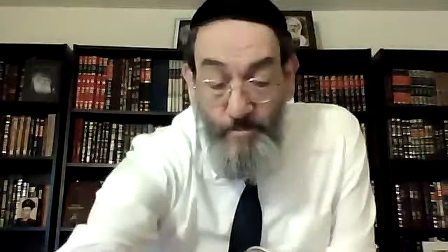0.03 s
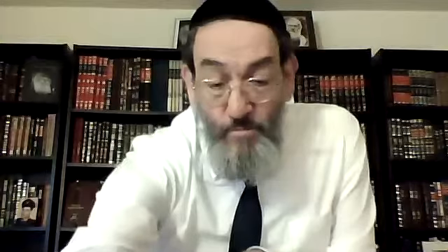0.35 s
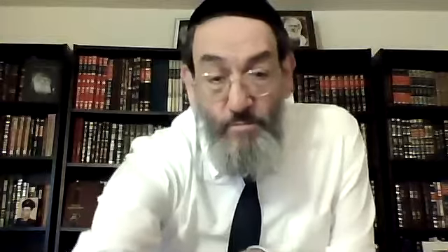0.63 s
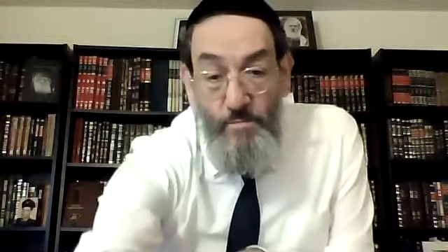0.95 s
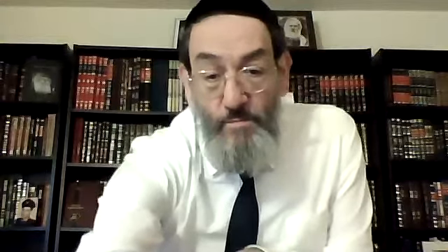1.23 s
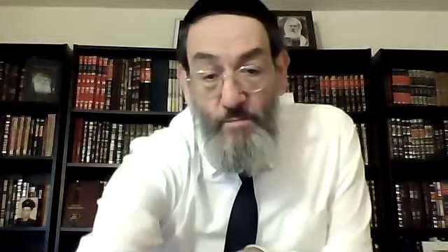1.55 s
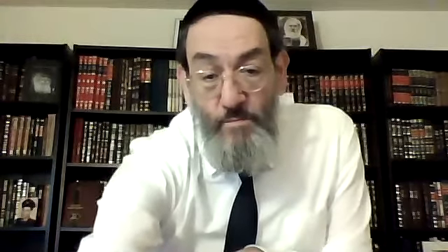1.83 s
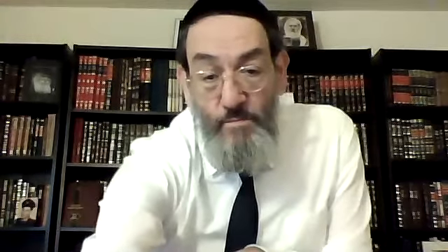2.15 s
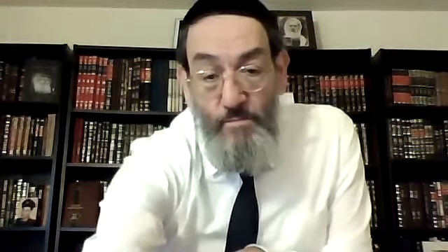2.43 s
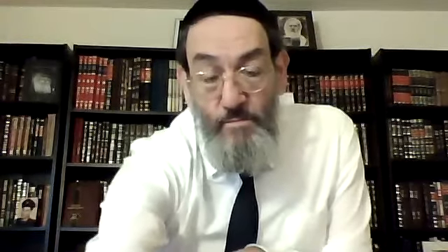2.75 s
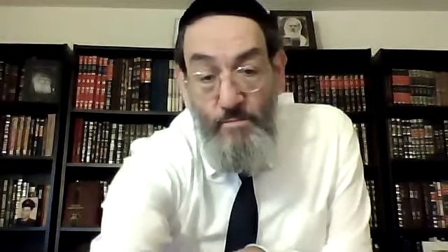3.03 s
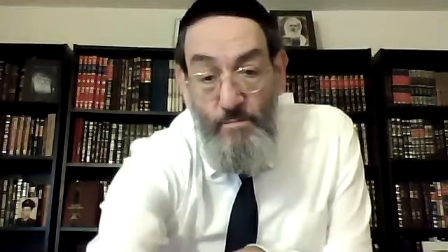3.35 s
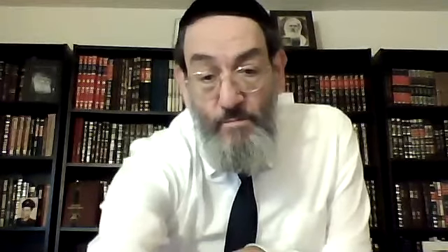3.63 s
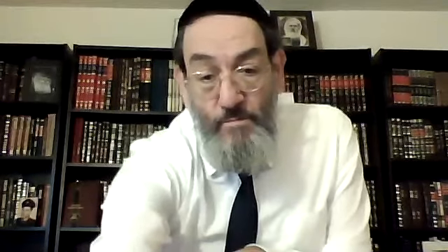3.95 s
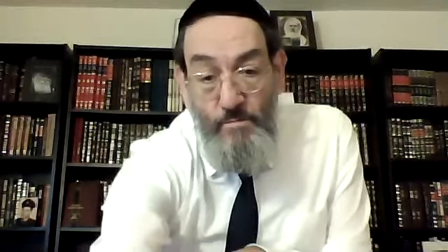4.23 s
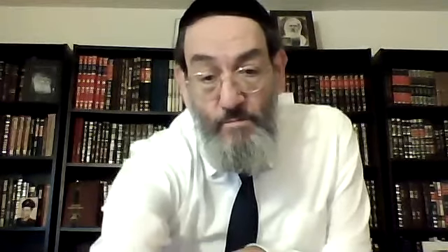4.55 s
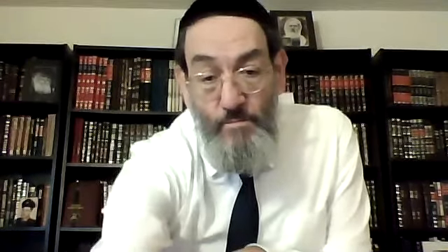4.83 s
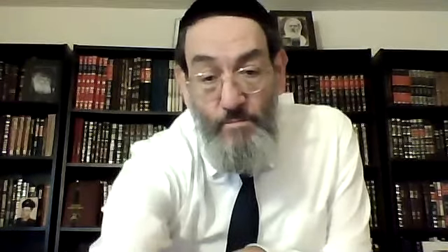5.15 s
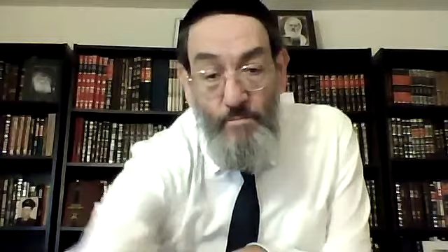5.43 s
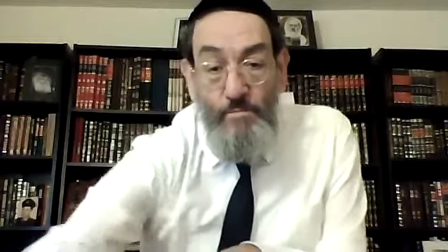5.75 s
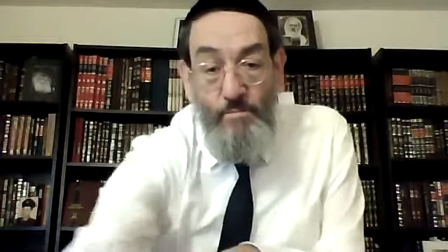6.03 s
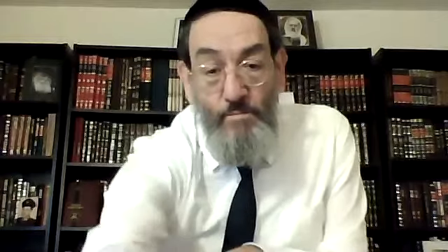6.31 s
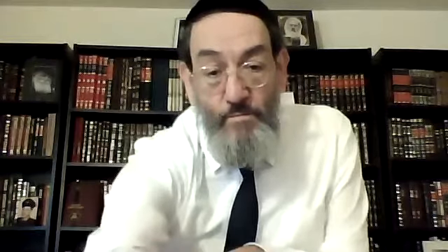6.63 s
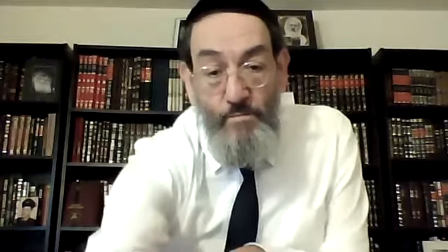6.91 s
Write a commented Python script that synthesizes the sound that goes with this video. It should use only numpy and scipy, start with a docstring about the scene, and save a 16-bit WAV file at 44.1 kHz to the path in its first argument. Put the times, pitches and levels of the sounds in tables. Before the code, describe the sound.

Two soft, dull bumps of a hand come through a wooden desk into the microphone standing on it, with faint ticks scattered between. Later a single much louder knock rings the wood briefly and rattles a loose plastic object, with a quick scrape. Under it all, a faint computer fan and a low hum run steadily in a small, furnished room with little echo.

```python
"""Bumps and a knock on a wooden desk

In a small, quiet room a computer fan whirs over a low, steady hum. A hand bumps the desk that
carries the microphone softly twice, making the wood ring, then knocks once so that a loose plastic
thing rattles. Small handling ticks come in between, and things hiss briefly as they slide."""
import sys
import numpy as np
from scipy import signal
from scipy.fft import rfft, irfft
from scipy.io import wavfile
from scipy.ndimage import uniform_filter1d

SR = 44100
rng = np.random.default_rng(int(sys.argv[2]) if len(sys.argv) > 2 else 0)


def inscribe(sig):
    """Save sig as 16-bit PCM at rate SR to the path in sys.argv[1].

    A 1-D sig is mono; a 2-D sig holds one channel per row.
    Samples are clipped to [-1, 1] before scaling.
    """
    pcm = np.round(np.clip(np.atleast_2d(sig).T, -1, 1) * 32767)
    wavfile.write(sys.argv[1], SR, pcm.astype(np.int16))


N = 307773
T = np.arange(N) / SR


def gain(db):
    """Turn decibels (dB) into a number to multiply a sound by."""
    return 10 ** (np.asarray(db) / 20)


def normalize(x):
    """Scale a signal so that its average size (rms) is 1."""
    return x / np.sqrt(np.mean(x ** 2))


def fade(t, fade_s):
    """Die away smoothly. A fade time is how long a sound takes to drop by 60 dB."""
    return np.exp(-np.log(1000) * t / fade_s)


def shape_tone(x, curve):
    """Make some frequencies louder and others softer, along a curve of (Hz, dB) points."""
    hz, db = np.transpose(curve)
    frequencies = np.maximum(np.arange(len(x) // 2 + 1) * SR / len(x), 1)
    change_db = np.interp(np.log(frequencies), np.log(hz), db)
    return irfft(rfft(x) * gain(change_db), len(x))


def drift(turns_per_s):
    """A smooth random wander around zero, about 1 in size."""
    step = int(SR / turns_per_s)
    stairs = np.repeat(rng.standard_normal(N // step + 1), step)
    smooth = uniform_filter1d(uniform_filter1d(stairs, step), step)
    return normalize(smooth[:N])


def add(out, start_s, x):
    """Mix the sound x into out, beginning at start_s."""
    i = int(start_s * SR)
    out[i:i + len(x)] += x[:N - i]


def strike(contacts, tones, damping_s=np.inf):
    """Pushes make an object ring: the longer the contact, the duller the sound."""
    t = T[:SR // 2]
    ring = sum(gain(db) * np.cos(2 * np.pi * hz * t) * fade(t, fade_s) for hz, db, fade_s in tones)
    out, push_t = np.zeros(N), T[:SR // 25]
    middle = push_t[len(push_t) // 2]
    for peak_s, db, contact_ms in contacts:
        force = np.exp(-2 * ((push_t - middle) * 1000 / contact_ms) ** 2)
        # A slow push lays more of the hand on the surface, which soaks up the ring.
        damped = ring * fade(t, damping_s / contact_ms ** 2)
        add(out, peak_s - middle, gain(db) * signal.fftconvolve(force / force.sum(), damped))
    return out


def fan(shaft_hz=47.48, speed_up_hz=0.42, flutter_db=1.5, wobble=.0012):
    """The tones of the shaft and blades follow the fan's speed; each flutters in the moving air."""
    # Each row: pitch as a multiple of the shaft's speed, level in dB.
    tones = [(4, -93), (5, -86.5), (10, -81), (12, -91.5), (14, -90.5), (16, -85.5), (17, -84), (18, -89),
             (22, -88), (24, -91.5), (34, -85.5), (51, -94), (70.4, -93)]
    # The fan runs a little faster between 2.35 and 5.6 seconds.
    speed_up = np.clip(np.minimum((T - 2.35) / .9, (5.6 - T) / .73), 0, 1)
    hz = (shaft_hz + speed_up_hz * speed_up) * (1 + wobble * drift(25))
    angle = 2 * np.pi * np.cumsum(hz) / SR
    return sum(np.sqrt(2) * gain(db + flutter_db * drift(4)) * np.sin(multiple * angle)
               for multiple, db in tones)


def motor_hum(hz=89.7, level_db=-73, wobble=.006):
    """A motor hums low, and its pitch wavers slightly."""
    pitch = hz * (1 + wobble * drift(4.3))
    angle = 2 * np.pi * np.cumsum(pitch) / SR
    return np.sqrt(2) * gain(level_db) * np.sin(angle)


def air(level_db=-74.5, drift_db=-0.07):
    """Air from the fan rushes evenly, with the microphone's hiss on top."""
    # Each row: frequency in Hz, relative strength of the noise there in dB.
    curve = [(20, -13.5), (60, -4), (100, 0.5), (200, 0), (330, -2.5), (700, -5.5), (1100, -5),
             (2000, -9.5), (3400, -14), (4500, -15), (7600, -16.5), (8400, -20), (13000, -21),
             (15500, -31.5)]
    rush = normalize(shape_tone(rng.standard_normal(N), curve))
    return rush * gain(level_db + drift_db * drift(3))


def faint_ticks(level_db=-64, hz=5600, spread_db=2, spread_octaves=0.32, count=2):
    """List a few chance ticks (seconds, dB, Hz) for each small shift of the arm."""
    # Each row: start and end of a movement in seconds.
    movements = [(0.5, 0.71), (2.5, 2.65), (5.45, 6.1), (6.6, 6.85)]
    return [(start + when * (end - start),
             level_db + spread_db * (2 * size - 1),
             hz * 2 ** (spread_octaves * (2 * pitch - 1)))
            for start, end in movements for when, size, pitch in rng.random((count, 3))]


def ticks(snap_db=-1.5, ping_db=-2.0, rise_s=0.00015):
    """Each handling tick is a dry snap of noise plus a tiny ping from the spot that was touched."""
    # Each row: start in seconds, level in dB, pitch of the ping in Hz.
    clear_ticks = [(0.6699, -59, 4180), (1.5349, -57.5, 3530), (1.5758, -61, 6630), (1.8472, -61, 4700),
                   (2.3082, -58.5, 6500), (2.5835, -61, 6230), (2.9262, -61, 6290), (3.044, -60.5, 4720),
                   (4.6024, -61, 3800), (5.6835, -60.5, 4970), (5.8406, -63, 5630), (6.2756, -63.5, 6100),
                   (6.6792, -59.5, 5680), (1.5429, -55, 1810), (3.5862, -57.5, 1960), (4.5979, -54.5, 1910),
                   (4.6134, -58.5, 1860), (4.7107, -59.5, 1740), (6.2204, -59, 1880), (6.3704, -58, 1760)]
    # Each row: frequency in Hz, relative strength of the snap there in dB.
    snap_curve = [(200, -2), (1500, 9), (2600, -19), (4000, 3), (5500, -6.5), (7000, 2), (8200, -7.5),
                  (11000, -7), (15000, -23)]
    out, t = np.zeros(N), T[:SR // 20]
    rise = 1 - np.exp(-t / rise_s)
    for start_s, db, hz in list(clear_ticks) + faint_ticks():
        noise = normalize(shape_tone(rng.standard_normal(len(t)), snap_curve))
        snap = gain(snap_db) * noise * fade(t, fade_s=0.014)
        ping = gain(ping_db) * np.sin(2 * np.pi * hz * t) * fade(t, fade_s=0.0087)
        add(out, start_s, gain(db) * rise * (snap + ping))
    return out


def hand_landing(time_s, db, contact_ms, finger_gap_ms, finger_drop_db, heel_delay_ms, flight_ms):
    """List one blow's contacts (seconds, dB, ms): fingers, full weight, heel of the hand, bounces."""
    heel_db, heel_contact_ms = -8, 2.26
    bounce_db, bounce_contact_ms = -7, 4.25
    rank = np.arange(1, 4)  # three fingers, three bounces
    # The earlier a finger lands, the lighter and shorter its touch.
    fingers = zip(time_s - rank * finger_gap_ms / 1000,
                  db - finger_drop_db * rank ** 1.5,
                  contact_ms * .55 ** rank)
    heel = (time_s + heel_delay_ms / 1000, db + heel_db, heel_contact_ms)
    delays_s = np.cumsum(flight_ms * .61 ** (rank - 1)) / 1000  # each hop is shorter than the last
    bounces = zip(time_s + delays_s, db + bounce_db * rank, np.full(len(rank), bounce_contact_ms))
    return [*fingers, (time_s, db, contact_ms), heel, *bounces]


def desk(low_cut_hz=75):
    """The wooden top rings under each blow and tap; the small microphone loses the deepest part."""
    # Each row: time in seconds, strength in dB, contact time in ms, gap between fingers in ms,
    # how much weaker the last finger is in dB, delay of the heel in ms, time to the first bounce in ms.
    blows = [(0.7223, -46, 3.7, 11, 10, 10.8, 27), (2.3084, -29.6, 3.73, 19.8, 13.5, 9, 40.4),
             (5.2378, -14, 0.93, 4.0, 10, 12.5, 59.5)]
    # Light fingertip taps. Each row: time in seconds, strength in dB, contact time in ms.
    taps = [(1.5402, -60, 2), (1.5465, -67, .6), (2.585, -70, .43), (3.587, -75, .1), (4.599, -73, .16),
            (4.614, -72.5, .14), (4.7115, -71, 0.17), (6.224, -72.5, 0.43), (6.3715, -71.5, 0.34)]
    # Each row: pitch in Hz, relative level in dB, fade time in seconds before the hand damps it.
    wood_tones = [(83, -14.5, 0.093), (101.1, 0, 0.13), (132, -7, 0.16), (153.2, 4.5, 0.06),
                  (172.2, -8, 0.083), (246, -18, 0.1), (309, -10.5, 0.12), (346, 3, 0.068),
                  (466, -16, 0.12), (529.4, 1.5, 0.044), (580, -5.5, 0.065), (783, -10.5, 0.13),
                  (997, -18.5, 0.048), (1090, -14, .045), (1187, -18.5, .08), (1290, -21.5, 0.044),
                  (1540, -23.5, .03), (1848, -20.5, .055), (2030, -21.5, 0.033)]
    contacts = [contact for blow in blows for contact in hand_landing(*blow)]
    thuds = strike(contacts + list(taps), wood_tones, damping_s=5.1)
    return signal.sosfilt(signal.butter(3, low_cut_hz, "high", fs=SR, output="sos"), thuds)


def rubs(grain_db=0.5, low_hz=800):
    """Things slide on the desk with a hiss that swells and dies, grainy as the surfaces catch."""
    # Each row: time of the peak in seconds, level in dB, time to rise by 60 dB in seconds,
    # fade time in seconds, top of the hiss in Hz.
    slides = [(2.317, -73.5, .06, .09, 1500), (3.415, -73, .2, 0.27, 2000),
              (5.236, -31.5, 0.02, 0.059, 1900), (5.2410, -47.5, .024, .045, 10820)]
    out = np.zeros(N)
    for peak_s, db, rise_s, fade_s, top_hz in slides:
        band = signal.butter(2, [low_hz, top_hz], "band", fs=SR, output="sos")
        hiss = signal.sosfilt(band, rng.standard_normal(N))
        grain = gain(grain_db * drift(500))
        swell = fade(np.abs(T - peak_s), np.where(T < peak_s, rise_s, fade_s))
        out += gain(db) * normalize(hiss * grain) * swell
    return out


def rattle():
    """A loose plastic thing jumps with the knock and clacks down on the desk."""
    # Each row: time in seconds, strength in dB, contact time in ms.
    clacks = [(5.2328, -46, 0.26), (5.2358, -36.5, 0.06), (5.2402, -25, 0.045), (5.2430, -13, 0.125),
              (5.2918, -61, 0.016)]
    # Each row: pitch in Hz, relative level in dB, fade time in seconds.
    plastic_tones = [(1110, -6, 0.015), (1882, -16, 0.019), (2500, -24, 0.0097), (3150, -22.5, 0.0222),
                     (3376, -10, 0.014), (3728, -6.5, 0.0092), (5155, -5, 0.037), (5460, -15, 0.023),
                     (6320, -16, .02), (6670, -16.5, 0.021), (7520, -22, 0.015), (9600, -15, 0.0066),
                     (10300, -12, 0.0047), (12570, -11, .003)]
    return strike(clacks, plastic_tones)


def room(x, echo_db, fade_s, top_hz):
    """Add the short blur of echoes from a small, well furnished room."""
    t = T[:SR // 2]
    tail = rng.standard_normal(len(t)) * fade(t, fade_s) * (1 - np.exp(-t / .004))
    tail = signal.sosfilt(signal.butter(1, [250, top_hz], "band", fs=SR, output="sos"), tail)
    echoes = signal.fftconvolve(x, tail / np.linalg.norm(tail))[:N]
    return x + gain(echo_db) * echoes


def scene():
    """Knocks reach the microphone mostly through the desk, ticks and rubs through the air."""
    knocks = room(desk() + rattle(), echo_db=-24, fade_s=0.15, top_hz=2200)
    sliding = room(rubs(), echo_db=-20, fade_s=0.26, top_hz=13000)
    handling = room(ticks(), echo_db=-6, fade_s=0.2, top_hz=9150)
    return (knocks + sliding + handling + fan() + motor_hum() + air())[None]


def record(dry):
    """The recorder steeply cuts off the highest treble."""
    top_hz = 15600
    return signal.sosfilt(signal.ellip(8, .2, 70, top_hz, fs=SR, output="sos"), dry)


dry = scene()
out = record(dry)
inscribe(out)
```